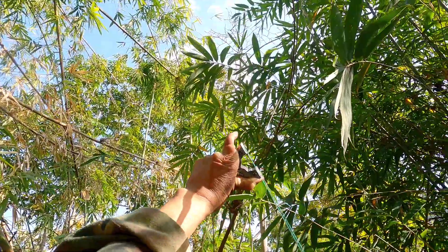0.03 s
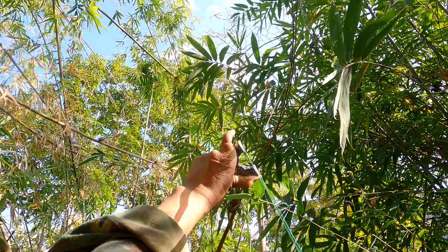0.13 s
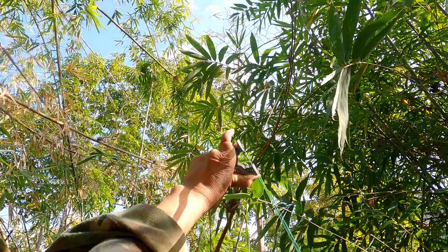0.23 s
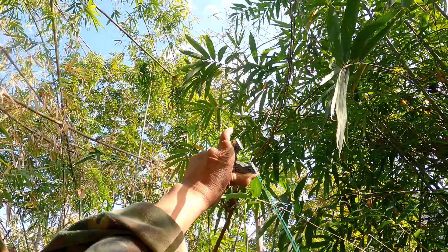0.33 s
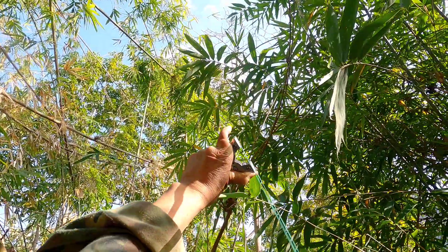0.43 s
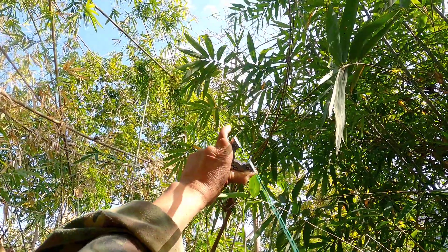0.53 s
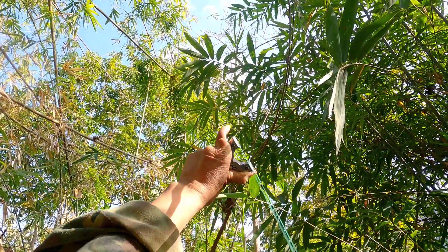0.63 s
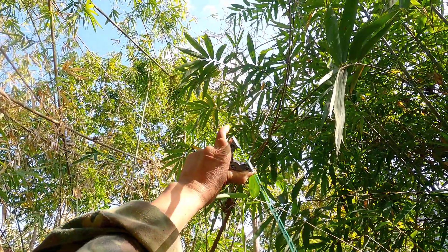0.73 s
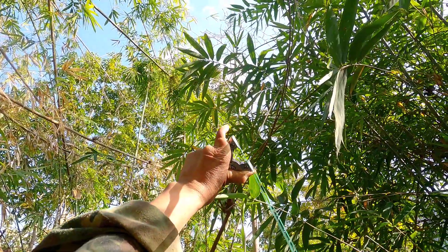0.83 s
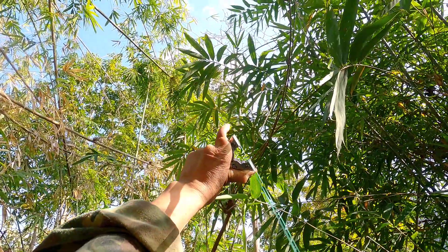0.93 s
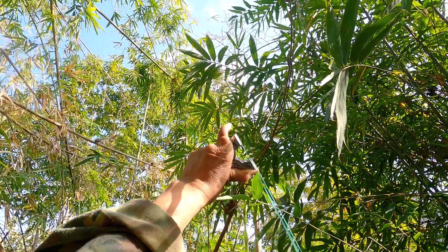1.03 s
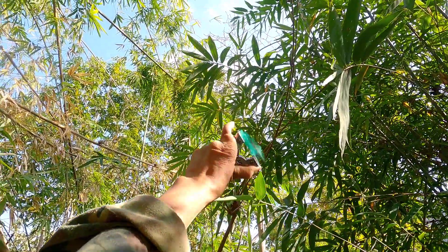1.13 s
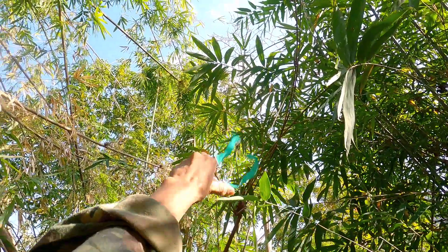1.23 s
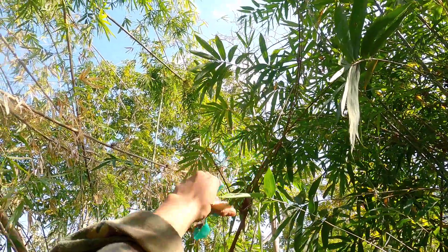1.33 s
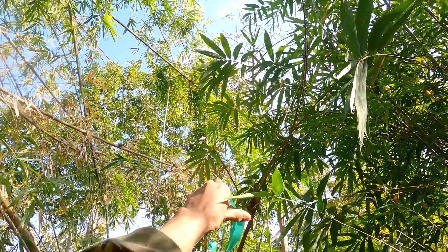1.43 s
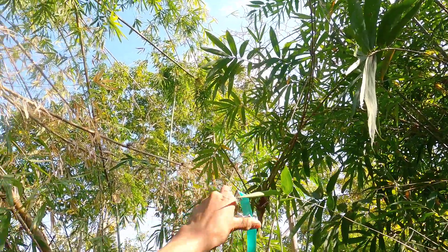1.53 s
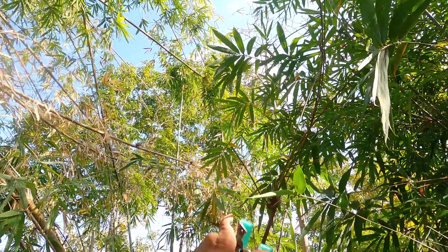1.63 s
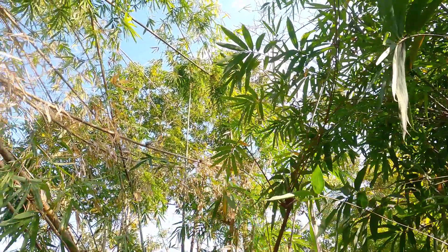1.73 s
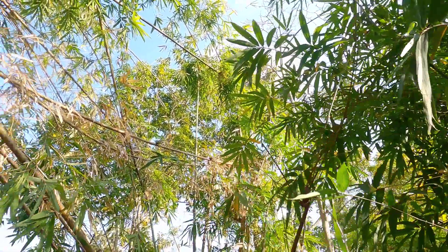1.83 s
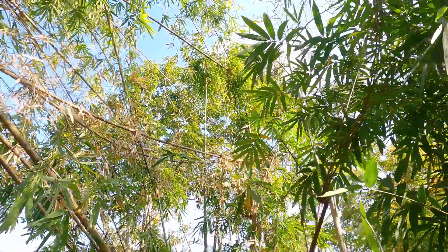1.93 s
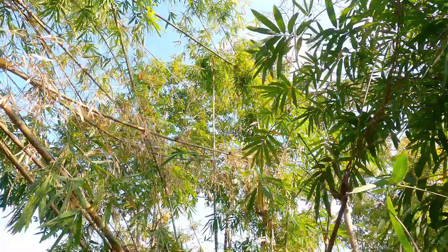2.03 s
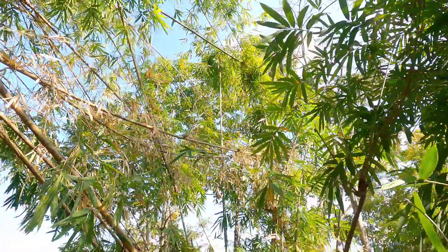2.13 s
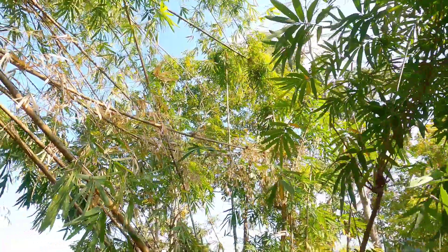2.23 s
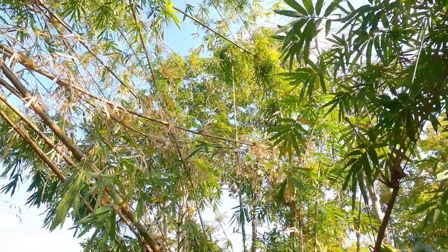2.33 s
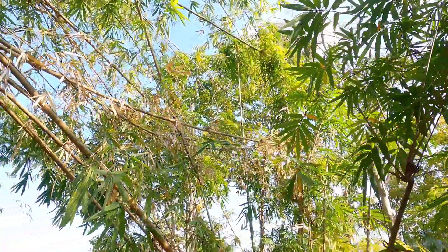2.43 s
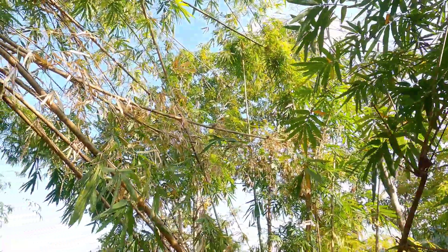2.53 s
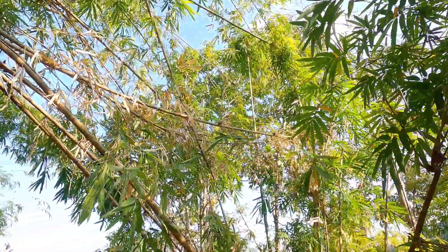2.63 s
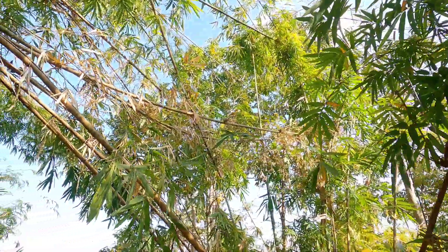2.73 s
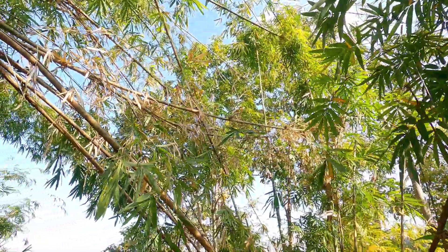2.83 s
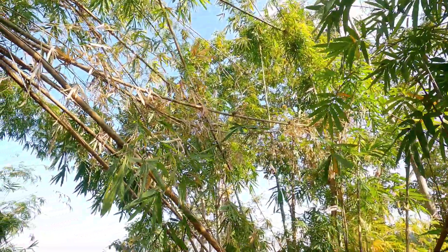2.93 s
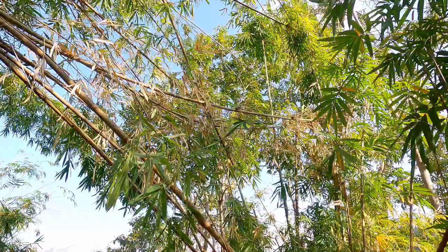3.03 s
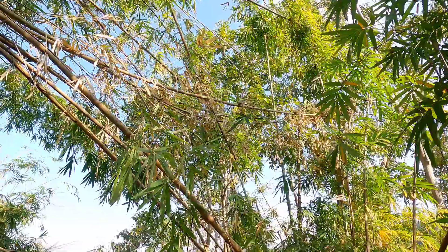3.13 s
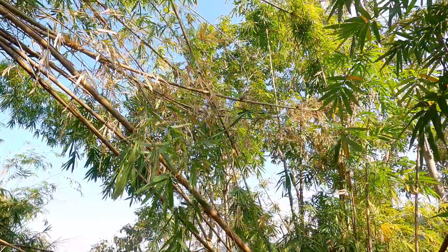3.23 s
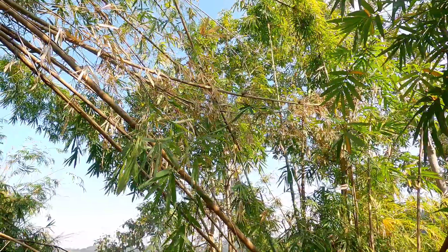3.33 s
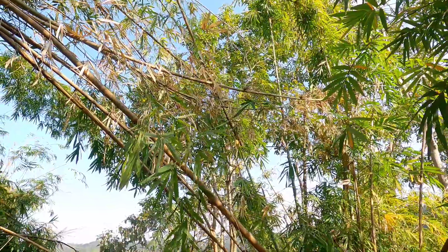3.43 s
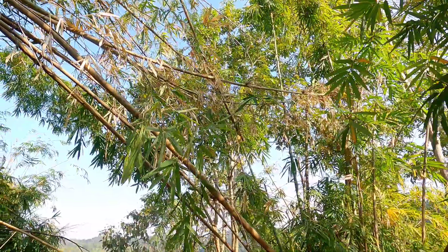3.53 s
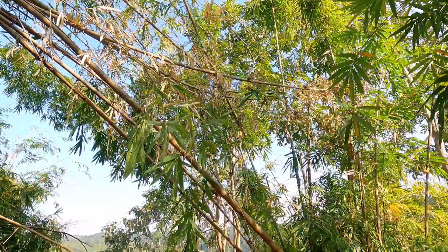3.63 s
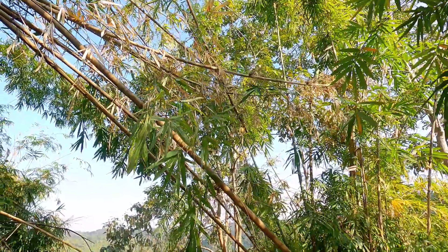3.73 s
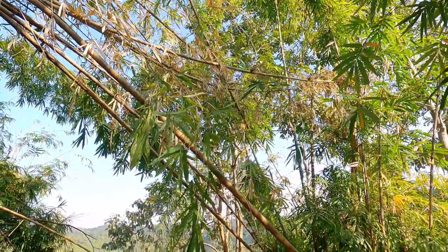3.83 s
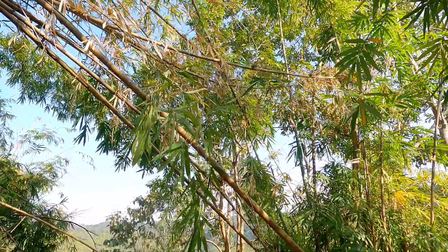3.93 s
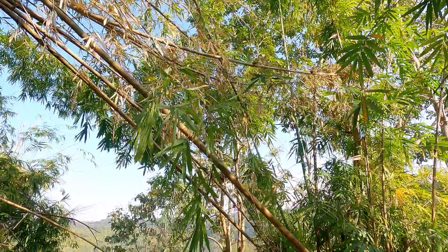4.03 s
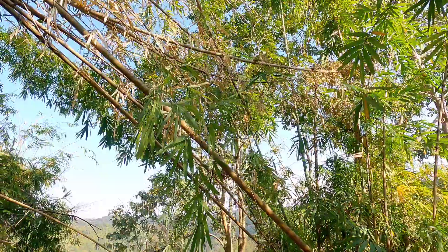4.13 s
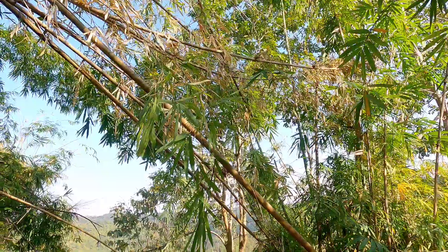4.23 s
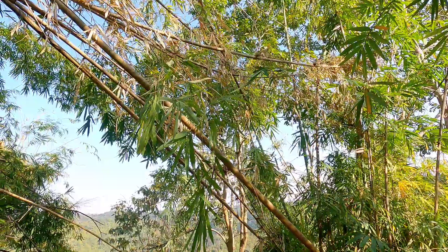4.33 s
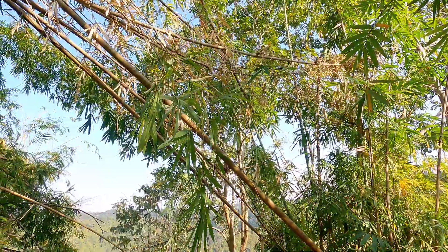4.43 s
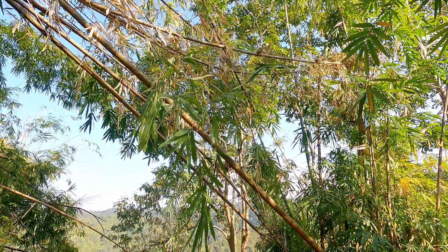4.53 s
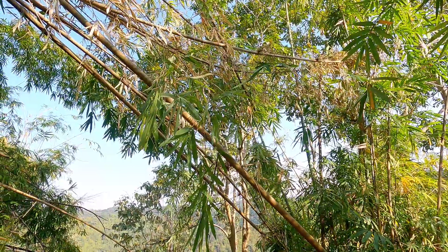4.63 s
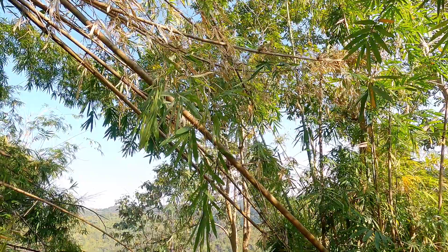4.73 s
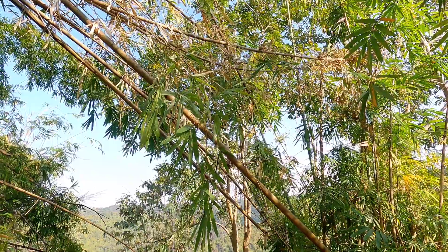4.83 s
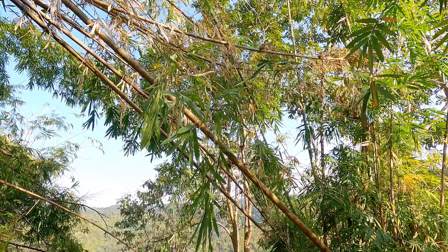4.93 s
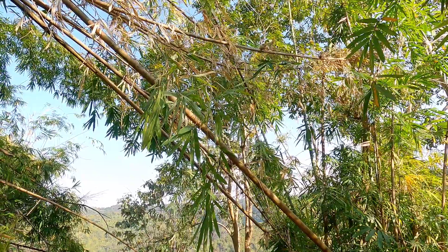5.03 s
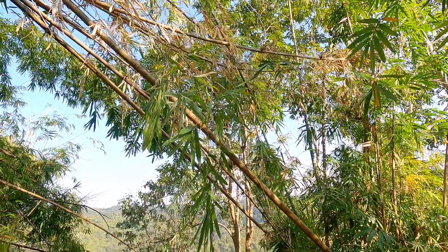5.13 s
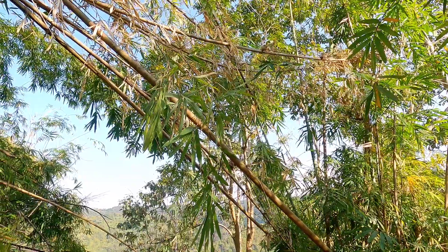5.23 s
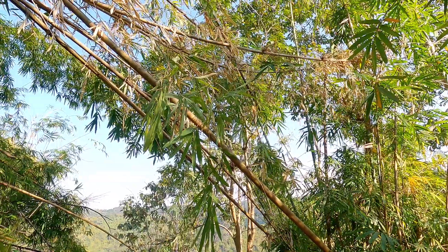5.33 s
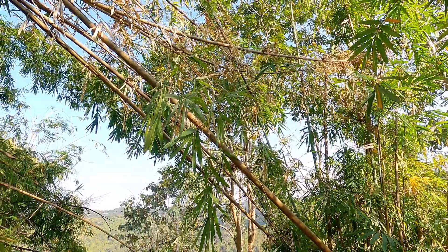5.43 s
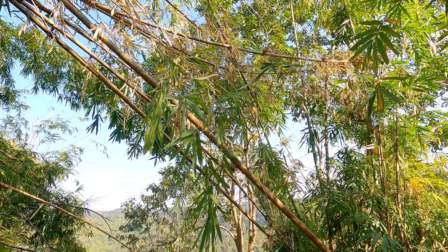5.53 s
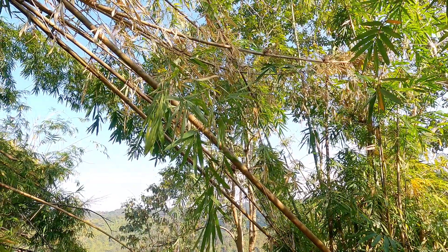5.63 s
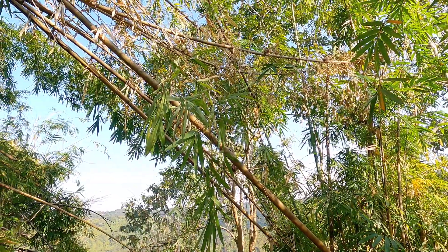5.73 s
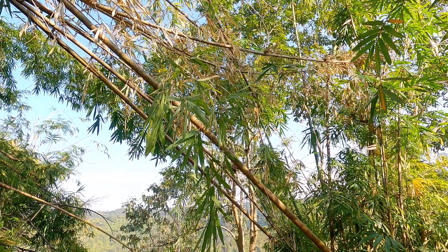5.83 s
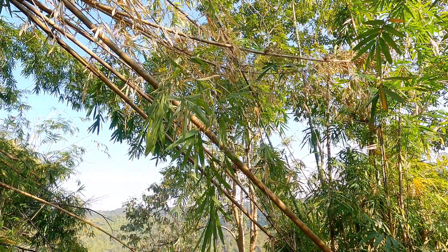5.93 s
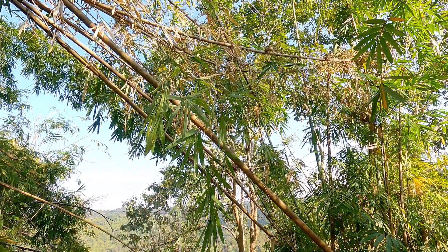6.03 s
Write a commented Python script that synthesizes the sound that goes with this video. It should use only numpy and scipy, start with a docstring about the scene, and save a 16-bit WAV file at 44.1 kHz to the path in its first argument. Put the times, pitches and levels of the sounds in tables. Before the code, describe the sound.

A slingshot fires with a sharp snap and a crack against bamboo, then a sleeve rustles and small birds chirp.

```python
"""Slingshot in a bamboo grove

The bands whip past a hand-held camera, shoving air, slap the hand and flap twice more.
The pellet cracks against a stem and the grove scatters the sound back. A sleeve rustles as the arm
drops, twigs tick, and small birds chirp and whistle over a soft, distant wash of air."""
import sys
import numpy as np
from scipy import signal
from scipy.fft import rfft, irfft, next_fast_len
from scipy.io import wavfile
from scipy.ndimage import map_coordinates

SR = 44100
rng = np.random.default_rng(int(sys.argv[2]) if len(sys.argv) > 2 else 0)


def output_pcm(signal):
    """Save a mono or channel-first signal as 16-bit PCM at the path in sys.argv[1].

    Samples are clipped to [-1, 1] before scaling.
    """
    pcm = np.clip(np.atleast_2d(signal).T, -1, 1) * 32767
    wavfile.write(sys.argv[1], SR, np.round(pcm).astype(np.int16))


N = 267951
TIME_S = np.arange(N) / SR


def amp(db):
    return 10 ** (np.asarray(db) / 20)


def unit_rms(x):
    return x / np.sqrt(np.mean(x ** 2) + 1e-20)


def log_interp(points, hz):
    f, values = np.transpose(points)
    return np.interp(np.log(hz + 1), np.log(f + 1), values)


def wobble(rate_hz, size):
    """Smooth random curve through rate_hz knots a second."""
    knots = rng.standard_normal(int(size * rate_hz / SR) + 4)
    return map_coordinates(knots, [np.arange(size) * rate_hz / SR])


def filtered(x, response):
    size = next_fast_len(N + SR // 2)
    return irfft(rfft(x, size) * response(np.fft.rfftfreq(size, 1 / SR)), size)[..., :N]


def coloured(x, colour):
    return filtered(x, lambda hz: amp(log_interp(colour, hz)))


def widened(pair, side_db):
    """Mid and side to left and right."""
    return pair[0] + amp(side_db) * np.array([pair[1], -pair[1]])


def noise(colour, side_db):
    return unit_rms(widened(coloured(rng.standard_normal((2, N)), colour), side_db))


def panned(x, left_db):
    return x * amp([[left_db / 2], [-left_db / 2]])


def add(track, at_s, sound):
    part = track[round(at_s * SR):][:len(sound)]
    part += sound[:len(part)]


def bursts(rows, colour, side_db):
    """Contacts: noise bursts that rise faster than they fall."""
    power = np.zeros(N)
    for at_s, db, width_s in rows:
        u = np.arange(-int(2 * width_s * SR), int(5 * width_s * SR)) / (width_s * SR)
        shape = np.where(u < 0, np.exp(-(2 * u) ** 2), np.cosh(2 * u) ** -2)
        add(power, at_s + u[0] * width_s, amp(db) ** 2 * shape)
    return np.sqrt(power) * noise(colour, side_db)


# Deep grove decay: f/Hz, t60/s
GROVE_T60 = [(150, .3), (1000, 0.49), (5000, 0.67), (9000, 0.39), (14000, 0.1087)]
def grove(x, near_db, far_db, near_t60_s):
    """Close stems scatter a quick answer, the deeper grove a slow one."""
    hz, t, spectra = signal.stft(rng.standard_normal((2, SR * 3 // 4)), SR, nperseg=256)
    far_decay = amp(-60 * t / log_interp(GROVE_T60, hz)[:, None])
    far = signal.istft(spectra * far_decay, SR, nperseg=256)[1]
    t = np.arange(far.shape[1]) / SR
    scatter = rng.standard_normal(far.shape) * np.abs(rng.standard_normal(len(t)))
    near = scatter * amp(-60 * t / near_t60_s)
    tail = amp(far_db) * far / np.linalg.norm(far[0]) + amp(near_db) * near / np.linalg.norm(near[0])
    mono = np.atleast_2d(x).mean(0)[None]
    return x + signal.fftconvolve(mono, widened(tail, side_db=-6), axes=1)[:, :N]


# Wash contour: t/s, relative level/dB
WASH_LEVELS = [(0.0, -63), (0.54, -64), (1.3, -64.5), (1.47, -68.5), (1.81, -67), (2.3, -64.5),
               (3.42, -64.5), (3.62, -63.5), (6.08, -62.5)]
# Wash and hiss spectra: f/Hz, level/dB
WASH_COLOUR = [(59, -50.5), (100, -21), (118, -22), (136, -4.5), (161, 1.5), (212, 1), (241, -1.5),
               (415, -2), (845, -6), (1260, -1), (2200, -12), (2860, -39.5), (4840, -120)]
HISS_COLOUR = [(1200, -18), (2200, 3), (3500, -3.5), (5000, -3), (7300, -5.5), (8300, -14.5),
               (12500, -19.5), (14000, -35)]
def air():
    """Distant wash, faint rumble, hiss of leaves and insects."""
    wash_db = np.interp(TIME_S, *np.transpose(WASH_LEVELS)) + 1.75
    wash = amp(wash_db + 0.698 * wobble(9.1, N)) * noise(WASH_COLOUR, side_db=-9.5)
    rumble = amp(-88) * noise([(20, 0), (100, -2.5), (400, -59.5), (2000, -120)], side_db=-6.5)
    hiss = amp(-72 + 1.6 * wobble(2.2, N)) * noise(HISS_COLOUR, side_db=-7)
    return wash + rumble + hiss


# Camera jolts: t/s, level/dB, width/s
JOLTS = [(.33, -64, .06), (1.13, -69, .1), (1.31, -41.5, 0.076), (1.73, -59.5, 0.25), (2.17, -56.5, 0.19),
         (2.66, -69, 0.31), (3.4, -77, .2), (4.2, -75, .03)]
# Handling spectrum: f/Hz, level/dB
RUMBLE_COLOUR = [(15, -3), (30, 3.5), (48, -4.5), (70, -24), (100, -30), (200, -44), (1000, -120)]
def handling():
    """The hand rumbles on the camera: faintly when still, louder when jogged."""
    grip = amp(-80.5) * noise(RUMBLE_COLOUR, side_db=-6)
    unsteadiness = amp(2 * wobble(12, N))
    jolts = bursts(JOLTS, RUMBLE_COLOUR, side_db=-6.5)
    return panned(unsteadiness * (grip + jolts), left_db=1)


def glide(length_s, first_hz, last_hz, db, shake, bend=1):
    """A sliding bird note; its shake, a share of the pitch, partly settles."""
    u = np.linspace(0, 1, int(length_s * SR))
    slide_hz = last_hz + (first_hz - last_hz) * (1 - u) ** bend
    hz = slide_hz * (1 + shake * (1 - 0.55 * u) * wobble(900, len(u)))
    swell = np.sqrt(np.abs(np.sin(np.pi * u))) * amp(2.4 * wobble(90, len(u)))
    return amp(db) * unit_rms(swell * np.sin(2 * np.pi * np.cumsum(hz) / SR))


# Peeping bouts: start/s, end/s
PEEP_BOUTS = [(.06, 1), (5.02, 6.05)]
def peeps(period_s=0.18, length_s=0.063, rise_hz=250):
    """A distant bird repeats a short rising note, almost evenly."""
    track = np.zeros(N)
    for start_s, end_s in PEEP_BOUTS:
        for at_s in np.arange(start_s, end_s, period_s):
            late, sharp, loud = rng.standard_normal(3)
            hz = 4800 * (1 + 0.03 * sharp)
            note = glide(length_s, hz, hz + rise_hz, db=-75 + 1.5 * loud, shake=0.055)
            add(track, abs(at_s + 0.015 * late), note)
    return track


# Brushes: t/s, level/dB, width/s
BRUSHES = [(.303, -60.5, 0.018), (.603, -70.5, 0.024), (1.325, -61, 0.048), (1.362, -54, .002),
           (1.42, -65, 0.047), (2.089, -63, .004), (2.338, -66, 0.0028), (2.672, -70, 0.014),
           (3.056, -66.5, .005)]
# Brush spectrum: f/Hz, level/dB
BRUSH_COLOUR = [(200, -37), (800, -33), (3000, -12.5), (6000, 0), (9000, 0), (12000, -1.5), (13500, -12),
                (15500, -34)]
def brushes():
    """Cloth and leaves brush, brief and crisp."""
    return bursts(BRUSHES, BRUSH_COLOUR, side_db=-9)


# Near chirps: t/s, top f/Hz, relative level/dB
CHIRPS = [(.315, 2580, -72), (1.79, 2343, -65), (2.311, 2680, -62.5), (2.462, 2756, -58.5),
          (2.495, 2617, -58.5), (2.558, 2593, -62.5), (2.628, 2810, -53.5), (2.652, 2600, -55),
          (2.75, 2750, -55.5), (2.924, 2897, -56.5), (2.983, 2690, -56.5), (3.072, 3090, -60.5),
          (3.173, 2930, -57), (3.406, 2746, -60), (3.675, 3135, -66.5), (3.758, 2870, -59.5)]
# Stem echoes: delay/s, level/dB
STEM_ECHOES = [(.011, -16), (.023, -11), (.037, -12)]
# Throat response: f/Hz, level/dB
THROAT = [(600, -30), (1200, -15), (1800, -5), (2400, -3), (2900, -6), (3800, 1), (5000, -7.5), (8000, -29)]
def chirps(length_s=0.072, sweep=0.46, waver=0.034, overtone_db=-14):
    """Hoarse notes sweep up and bend over, shaped by the throat and echoed by nearby stems."""
    track = np.zeros(N)
    for at_s, top_hz, db in CHIRPS:
        u = np.linspace(0, 1, int(length_s * np.exp(0.06 * rng.normal()) * SR))
        crest = 0.6 * rng.uniform(0.9, 1.1)
        arch = 1 - sweep * (1 - u / crest) ** 2
        hz = top_hz * arch * (1 + waver * wobble(705, len(u)))
        phase = 2 * np.pi * np.cumsum(hz) / SR
        swell = np.sqrt(np.abs(np.sin(np.pi * u))) * amp(3 * wobble(250, len(u)))
        note = amp(db) * unit_rms(swell * (np.sin(phase) + amp(overtone_db) * np.sin(2 * phase)))
        add(track, at_s, note)
        for delay_s, echo_db in STEM_ECHOES:
            add(track, at_s + delay_s * np.exp(0.2 * rng.normal()), amp(echo_db) * note)
    voice = panned(amp(1) * coloured(track, THROAT), left_db=-3)
    return grove(voice, near_db=-8, far_db=-12, near_t60_s=0.13)


# Slurs: t/s, length/s, top f/Hz, climb/Hz, relative level/dB
SLURS = [(.6, .13, 4250, 1352, -74), (3.45, 0.12, 4003, 1305, -65.5), (4.068, .11, 3800, 599, -63),
         (4.754, .09, 3906, 383, -60.5), (5.563, .08, 4380, 649, -73)]
def slurs():
    """A far bird slides upward and levels off."""
    track = np.zeros(N)
    for at_s, length_s, top_hz, climb_hz, db in SLURS:
        add(track, at_s, glide(length_s, top_hz - climb_hz, top_hz, db, shake=0.036, bend=2.1))
    return track


# Whistles: t/s, length/s, first f/Hz, last f/Hz, relative level/dB
WHISTLES = [(0.696, 0.035, 2610, 2790, -61.5), (4.36, 0.046, 5980, 6200, -66),
            (5.06, 0.14, 1399, 1100, -64), (5.476, .26, 3550, 2930, -64), (5.82, 0.11, 2050, 1835, -67)]
def whistles():
    """Far birds whistle plain, nearly pure slides."""
    track = np.zeros(N)
    for at_s, *note in WHISTLES:
        add(track, at_s, glide(*note, shake=0.027))
    return track


# Wake spectrum: f/Hz, level/dB
WAKE_COLOUR = [(20, -6), (60, 2), (200, -0.5), (400, -10.5), (800, -21.5), (2000, -45.5), (6000, -120)]
def wake(peak_s=1.186, peak_db=-25.5, swing_s=0.066):
    """Air dragged by the bands builds, sags while they swing, then dies amid slow eddies."""
    t = TIME_S - peak_s
    rise_db = 1500 * np.minimum(t, 0)
    sag_db = -240.5 * np.clip(t, 0, swing_s)
    fall_db = -803 * np.maximum(t - swing_s, 0)
    rush = amp(peak_db + rise_db + sag_db + fall_db) * noise(WAKE_COLOUR, side_db=-9)
    eddies = bursts([(1.235, -55, 0.06)], WAKE_COLOUR, side_db=-8.5)
    return rush + eddies


# Air pushes: t/s, relative level/dB, first f/Hz, t60/s
SHOVES = [(1.189, -1.5, 1150, 0.047), (1.218, -20.5, 899, .03), (1.239, -31, 400, 0.085)]
def shoves(slowing_s=0.00051, attack_s=0.00063):
    """Each swing shoves air aside; the pitch drops as the bands lose speed."""
    track = np.zeros(N)
    t = np.arange(SR // 5) / SR
    for at_s, db, first_hz, t60_s in SHOVES:
        phase = 2 * np.pi * first_hz * slowing_s * np.log1p(t / slowing_s)
        envelope = (1 - np.exp(-t / attack_s)) * amp(db - 60 * t / t60_s)
        add(track, at_s, -envelope * np.sin(phase))
    thump = coloured(track, [(30, 0.5), (60, 0), (100, -8.5), (160, 1.5), (400, 1.5)])
    skew_rad = np.array([[0.2], [-0.2]])  # moving air meets the two microphone ports out of step
    return filtered(thump, lambda hz: np.exp(1j * skew_rad * np.minimum(hz / 60, 1)))


# Slaps on the hand: t/s, level/dB, width/s
SLAPS = [(1.1903, -14.5, 0.0018), (1.1957, -9, 0.0012), (1.2193, -19, 0.0025), (1.2238, -23.5, 0.002),
         (1.2402, -25, 0.0027)]
# Rubber spectrum: f/Hz, level/dB
RUBBER_COLOUR = [(400, -17), (700, -8), (1100, -1.5), (1400, -8.5), (1750, -4), (2500, -9.5), (3700, -6),
                 (4400, -9.5), (5300, -3), (6700, -8.5), (10200, -8.5), (12500, -16), (15500, -36.5)]
def slaps(skid_lead_s=0.001, skid_gain_db=-18, skid_width_s=0.0086):
    """Bands and pouch skid and strike the hand; each blow scatters differently in the grove."""
    track = np.zeros((2, N))
    for at_s, db, width_s in SLAPS:
        skid = (at_s - skid_lead_s, db + skid_gain_db, skid_width_s)
        contact = bursts([(at_s, db, width_s), skid], RUBBER_COLOUR, side_db=-10)
        track += grove(contact, near_db=-11.5, far_db=-23.5, near_t60_s=0.16)
    return track


# Impact spectrum: f/Hz, level/dB
PELLET_COLOUR = [(100, -34), (400, -3), (1100, 3), (1800, -6), (3500, -0.5), (6000, 0), (7700, -3),
                 (8300, -15), (12000, -22.5), (14500, -44), (16000, -60)]
def pellet(at_s=1.3814, click_db=-14.5, knock_db=-18, knock_hz=1050, knock_t60_s=0.0075):
    """A hard click and a hollow knock on a stem, far enough off to be rich in echoes."""
    size = 2048
    cepstrum = irfft(np.log(amp(log_interp(PELLET_COLOUR, np.fft.rfftfreq(size, 1 / SR)))))
    cepstrum[1:size // 2] *= 2  # fold to minimum phase for a sharp onset
    cepstrum[size // 2 + 1:] = 0
    click = irfft(np.exp(rfft(cepstrum)))
    t = np.arange(size) / SR
    knock = np.sin(2 * np.pi * knock_hz * t) * amp(knock_db - 60 * t / knock_t60_s)
    track = np.zeros(N)
    add(track, at_s, amp(click_db) * click / np.abs(click).max())
    add(track, at_s + 0.0003, knock)
    return grove(track, near_db=-3.5, far_db=-13.5, near_t60_s=0.13)


# Rasps: t/s, length/s, first f/Hz, last f/Hz, relative level/dB
RASPS = [(1.606, 0.027, 5200, 3730, -60.5), (1.775, 0.034, 5180, 3710, -60),
         (3.345, 0.02515, 7640, 7310, -70), (3.731, 0.073, 5975, 5380, -65),
         (3.877, 0.097, 4410, 2863, -63.5), (4.066, 0.084, 5800, 5560, -64),
         (4.548, 0.084, 4400, 2450, -61.5)]
def rasps():
    """Far, falling bird calls, roughened by a fast pitch shake."""
    track = np.zeros(N)
    for at_s, *note in RASPS:
        add(track, at_s, glide(*note, shake=0.141))
    return track


# Arm moves: t/s, sleeve level/dB, rub level/dB, width/s
ARM_MOVES = [(2.117, -58, -70, 0.073), (2.347, -65.5, -62.5, 0.19), (2.629, -65.5, -64.5, 0.34),
             (3.078, -61.5, -66, 0.19)]
# Sleeve and rub spectra: f/Hz, level/dB
SLEEVE_COLOUR = [(90, -30), (200, 1), (700, 10), (2500, 11.5), (6500, 6), (9000, -6), (12300, -11),
                 (13500, -26), (15000, -50)]
RUB_COLOUR = [(90, -40), (130, -6), (160, 3), (220, -9), (400, -14.5), (900, -30), (4000, -120)]
def arm():
    """The sleeve catches and slips in small steps; the hand rubs dully on the camera."""
    at_s, sleeve_db, rub_db, width_s = np.transpose(ARM_MOVES)
    creases = unit_rms(amp(0.86 * wobble(10, N) + 2.22 * wobble(600, N)))
    sleeve = creases * bursts(zip(at_s, sleeve_db, width_s), SLEEVE_COLOUR, side_db=-9)
    rubs = bursts(zip(at_s, rub_db, width_s), RUB_COLOUR, side_db=-13.5)
    return sleeve + panned(rubs, left_db=1)


# Twig ticks: t/s, level/dB, width/s
TWIGS = [(5.268, -47.5, 0.0015), (5.284, -64, .002), (5.371, -59, 0.0021), (5.379, -54, 0.0045),
         (5.3855, -46.5, 0.002), (5.3885, -44.5, 0.0012), (5.398, -70, 0.012)]
# Twig spectrum: f/Hz, level/dB
TWIG_COLOUR = [(300, -23), (1200, -7), (2000, 3.5), (3000, 1), (4000, -7), (7300, -9), (8500, -26),
               (12500, -34), (15000, -60)]
def twigs():
    """Dry twigs tick in a quick cluster."""
    return bursts(TWIGS, TWIG_COLOUR, side_db=-10.5)


def scene():
    """The shot, its hit and the living grove."""
    hit = pellet()
    near_birds = chirps()
    bands = panned(slaps(), left_db=-0.9) + panned(shoves() + wake(), left_db=-1.5)
    calls = slurs() + rasps() + whistles() + peeps()
    far_birds = amp(-4.5) * grove(calls, near_db=-2.5, far_db=-9, near_t60_s=0.39)
    rustles = grove(twigs() + brushes(), near_db=-8, far_db=-14.5, near_t60_s=0.15)
    return bands + hit + near_birds + far_birds + rustles + handling() + arm() + air()


def record(dry):
    """Clip at full scale, then cut the top treble."""
    return filtered(np.clip(dry, -1, 1), lambda hz: hz < 15800)


dry = scene()
out = record(dry)
output_pcm(out)
```